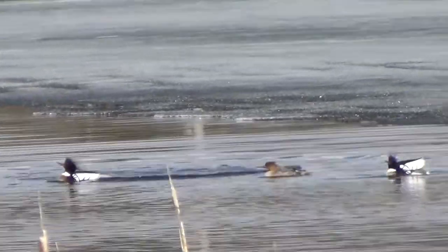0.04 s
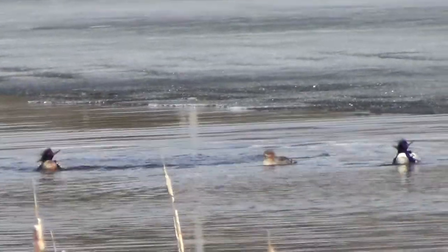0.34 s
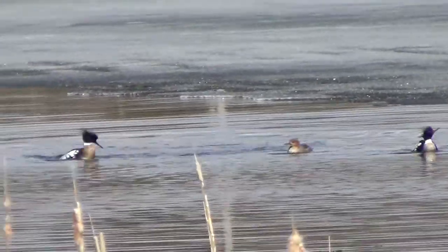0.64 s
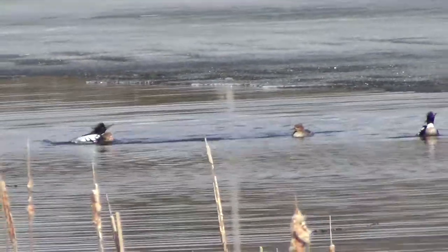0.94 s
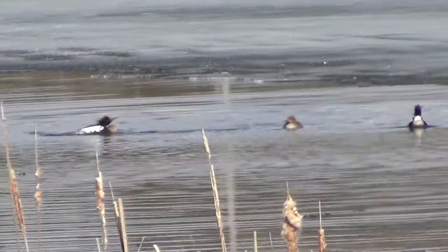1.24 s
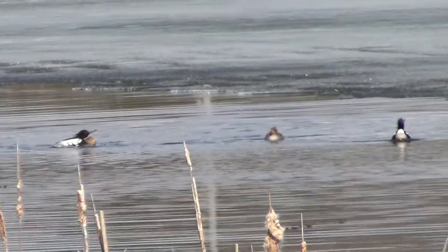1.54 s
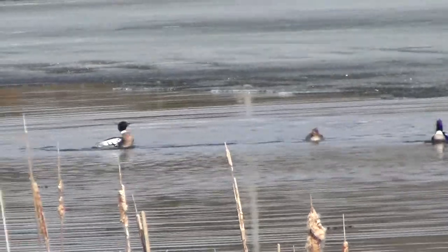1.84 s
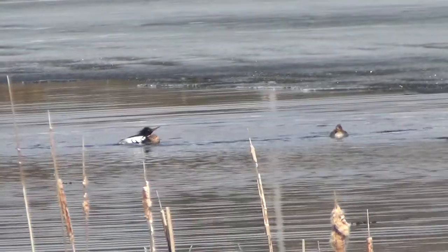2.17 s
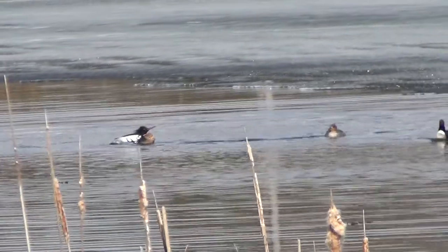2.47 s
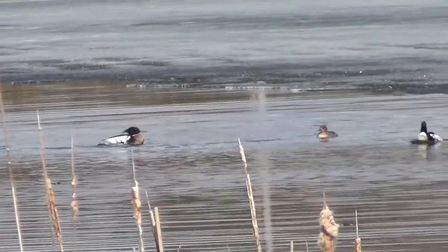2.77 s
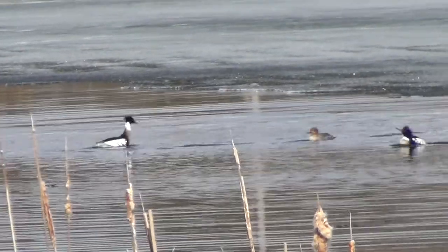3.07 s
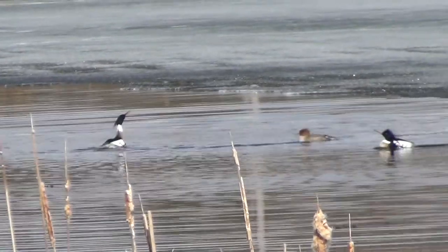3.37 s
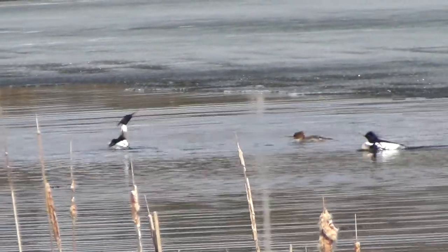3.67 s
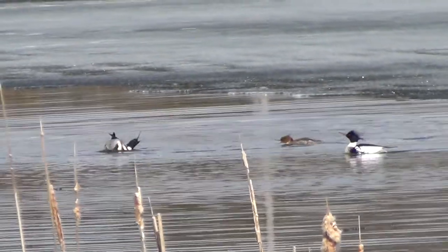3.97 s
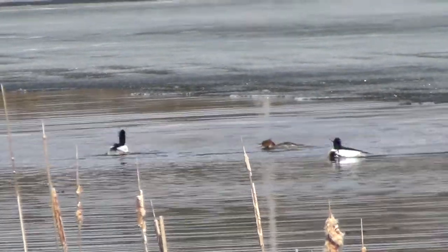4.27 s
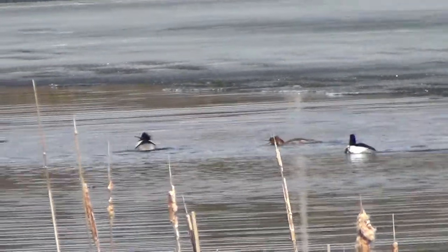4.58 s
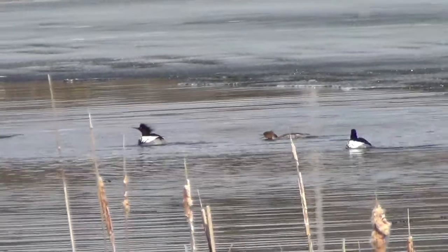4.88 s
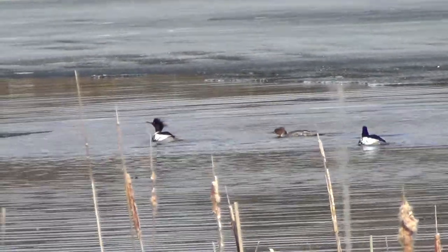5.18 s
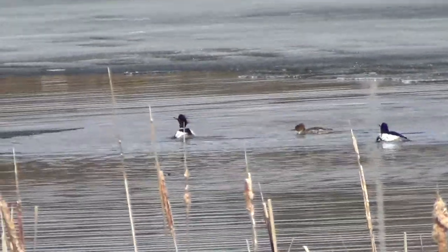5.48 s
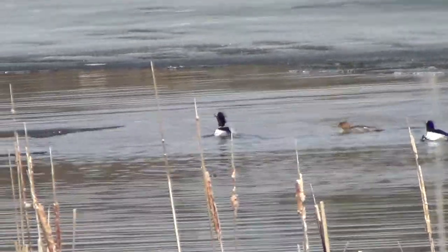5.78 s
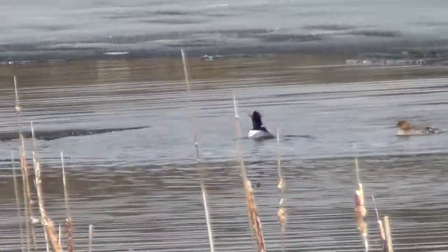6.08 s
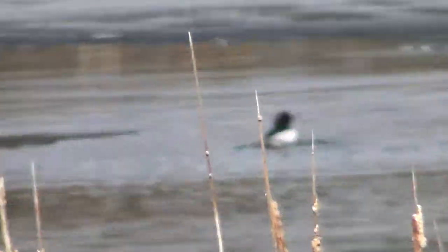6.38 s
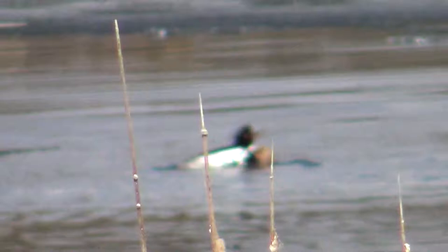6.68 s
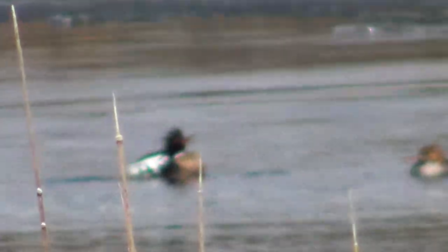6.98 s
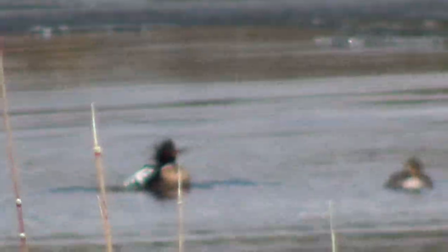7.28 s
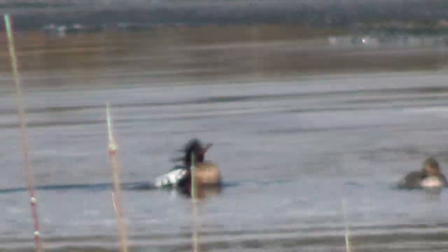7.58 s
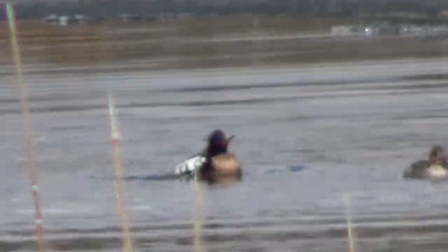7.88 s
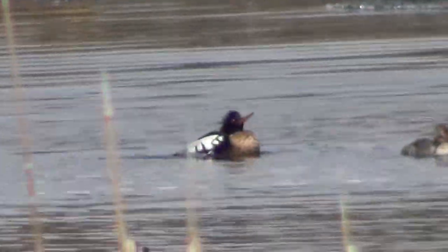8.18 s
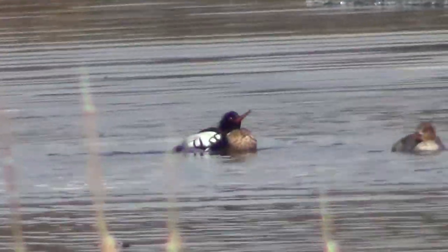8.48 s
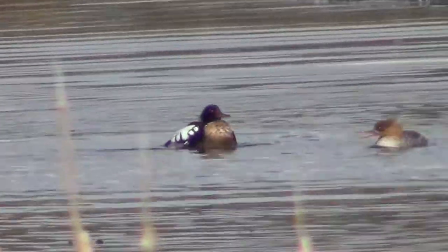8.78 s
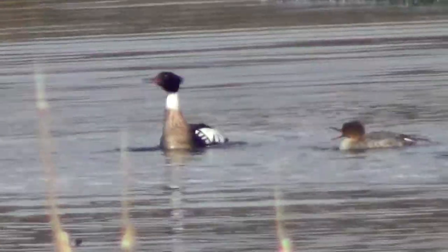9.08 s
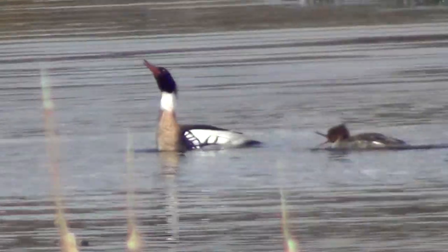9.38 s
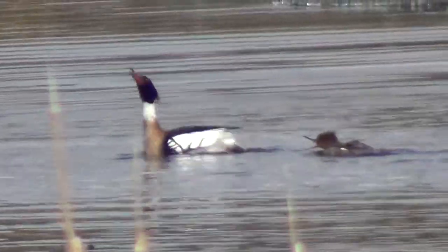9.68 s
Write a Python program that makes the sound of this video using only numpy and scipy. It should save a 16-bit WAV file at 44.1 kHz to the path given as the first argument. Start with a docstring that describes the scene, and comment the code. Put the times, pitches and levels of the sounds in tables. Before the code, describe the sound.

Light, steady wind and a low, distant engine hum lie over an open lake, while the hand-held camera whirrs faintly right at the microphone. Fingers bump its case now and then, and small birds chip far away. Just past the middle, a marsh bird gives one short, high, buzzy trill as the zoom motor hisses softly. Near the end, among faint twittering, a catch snaps sharply against the case.

```python
"""Light wind and a distant engine lie under the whirr and thin whine of a hand-held camera.
Fingers bump its case now and then, and small birds chip far off across a thawing lake.
The zoom motor runs briefly as a marsh bird at the water's edge gives one short buzzy trill,
its two voices beating in each quick syllable. Near the end a catch snaps sharply against the case."""
import sys
import numpy as np
from scipy import signal
from scipy.fft import rfft, irfft, next_fast_len
from scipy.io import wavfile
from scipy.ndimage import uniform_filter1d

SR = 44100
rng = np.random.default_rng(int(sys.argv[2]) if len(sys.argv) > 2 else 0)


def put_to_file(sound):
    """Save the sound as 16-bit audio at rate SR, in the file named by the first command-line argument."""
    columns = np.atleast_2d(sound).T  # one column per channel
    safe = np.clip(columns, -1, 1)
    whole_steps = np.round(safe * 32767)
    wavfile.write(sys.argv[1], SR, whole_steps.astype(np.int16))


N = 437913


def from_db(db):
    """Decibels to gain."""
    return 10 ** (np.asarray(db) / 20)


def curve(rows):
    """Automation lanes: each column joined by straight lines in time."""
    times, *columns = np.transpose(rows)
    return [np.interp(np.arange(N) / SR, times, column) for column in columns]


def at_hz(points, hz):
    """An EQ curve read on a log-frequency axis."""
    point_hz, values = np.transpose(points)
    return np.interp(np.log(hz + 1e-9), np.log(point_hz), values)


def add(track, s, sound):
    """Mix a short sound in from a given time."""
    i = round(s * SR)
    track[i:i + len(sound)] += sound[:N - i]


def band(x, low_hz, high_hz, order=2):
    """Causal band-pass."""
    return signal.sosfilt(signal.butter(order, [low_hz, high_hz], "band", fs=SR, output="sos"), x)


def pan(lean_db):
    """Stereo gains for a level difference, left minus right."""
    return from_db(np.array([[.5], [-.5]]) * lean_db)


def white():
    """Frequencies and spectrum of white noise of unit power per Hz."""
    size = next_fast_len(N, True)
    return np.fft.rfftfreq(size, 1 / SR), rfft(rng.standard_normal(size)) * np.sqrt(SR / 2)


def drift(rate_hz):
    """A slow random modulator with spread 1."""
    hz, noise = white()
    slow = irfft(noise * np.exp(-(hz / rate_hz) ** 2))[:N]
    return slow / slow.std()


def ring(hz, t60):
    """A struck mode."""
    t = np.arange(SR // 4) / SR
    return np.sin(2 * np.pi * hz * t) * np.exp(-np.log(1000) * t / t60)


def burst(t60, low_hz, high_hz):
    """Noise that starts at unit strength and dies away."""
    t = np.arange(SR // 2) / SR
    noise = band(rng.standard_normal(len(t)), low_hz, high_hz)
    return noise / noise.std() * np.exp(-np.log(1000) * t / t60)


def whistle(length, start_hz, end_hz, rasp, soft=0.67):
    """A gliding note; rasp shakes its pitch, soft is the share spent fading in and out."""
    size = max(8, round(length * SR))
    shake = uniform_filter1d(rng.standard_normal(SR // 6), size=49)[:size] * np.sqrt(49)
    hz = np.linspace(start_hz, end_hz, size) * (1 + rasp * shake)
    cycles = np.cumsum(hz) / SR + rng.random()
    return np.sin(2 * np.pi * cycles) * signal.windows.tukey(size, soft)


def play_notes(notes, rasp):
    """Whistles centred on their cue times."""
    out = np.zeros(N)
    for s, length, start_hz, end_hz, db in notes:
        add(out, s - length / 2, from_db(db) * whistle(length, start_hz, end_hz, rasp))
    return out


def shore(x, near_db, echo_db):
    """Lakeside reverb: reeds smear each note at once, the banks add a faint, longer tail."""
    out = x
    for db, t60 in ((near_db, 0.075), (echo_db, 0.29)):
        tail = burst(t60, 1500, 6700)
        out = out + from_db(db) * signal.fftconvolve(x, tail / np.linalg.norm(tail))[:N]
    return out


# Tone of the wind bed: f/Hz, density/(dB per Hz)
WIND_SPECTRUM = [(20, -109), (32, -95), (45, -83.5), (56, -88), (85, -86), (105, -85), (145, -78.5),
                 (190, -86), (380, -92.5), (1050, -93.5), (1600, -99), (3200, -100.5), (7000, -104),
                 (9000, -105), (14000, -108)]
# Its stereo width: f/Hz, left-right correlation (1 is mono)
WIND_CORRELATION = [(30, .6), (70, .78), (140, 0.93), (260, .78), (550, 0.83), (1200, 0.95), (2500, 1),
                    (5000, 1), (7800, 0.75), (11000, 1)]
# Its balance: f/Hz, left minus right/dB
WIND_PAN = [(30, -11), (65, -11), (130, -5.5), (220, -3.5), (400, 1), (700, 0), (1250, -2), (2300, 0.5),
            (6000, -0.5)]


def wind(breeze_db=0.02, gust_db=0.8):
    """Wind and far rumble, nearly alike on both sides; gusts move the lows, the hiss stays still."""
    (hz, mid), (_, side) = white(), white()
    alike = at_hz(WIND_CORRELATION, hz)
    stereo = np.sqrt((1 + alike) / 2) * mid + np.sqrt((1 - alike) / 2) * side * [[1], [-1]]
    bed = stereo * from_db(at_hz(WIND_SPECTRUM, hz)) * pan(at_hz(WIND_PAN, hz))
    lows = 1 / (1 + (hz / 1500) ** 2)
    gusts = from_db(breeze_db + gust_db * drift(rate_hz=.6))
    return irfft(bed * lows)[:, :N] * gusts + irfft(bed * (1 - lows))[:, :N]


# Engine drone: t/s, low tone f/Hz, low tone level/dB, upper tone level/dB
ENGINE_DRONE = [(0, 66.9, -69.5, -72), (2.4, 70.22, -68, -64.5), (6.6, 70.2, -67.5, -64.5),
                (7.9, 71.8, -66.5, -59), (8.6, 70.4, -60.5, -64.5), (9.93, 71.7, -65.5, -75)]


def distant_engine(upper_ratio=2.17, waver=0.01183, fading_db=2.5):
    """Two low tones follow one speed; they waver and fade on their way over the water."""
    low_hz, low_db, upper_db = curve(ENGINE_DRONE)
    out = 0
    for hz, db in ((low_hz, low_db), (low_hz * upper_ratio, upper_db)):
        phase = 2 * np.pi * np.cumsum(hz * (1 + waver * drift(rate_hz=6.36))) / SR
        out = out + from_db(db + fading_db * drift(rate_hz=4.7)) * np.sin(phase)
    return out * pan(lean_db=-6.0)


def motor(resonances, fader):
    """Running friction heard through the body's resonances, each with its own stereo position."""
    hz, noise = white()
    body = 0
    for centre_hz, width_hz, db, lean_db, lead in resonances:
        peak = 1 / (1 + ((hz - centre_hz) / (width_hz * 0.7)) ** 2)
        phase_offset = np.exp(1j * lead * np.array([[.5], [-.5]]))
        body = body + from_db(db) * peak * pan(lean_db) * phase_offset
    return irfft(noise * body)[:, :N] * from_db(curve(fader)[0])


# Body resonances: f/Hz, width/Hz, pre-fader density/(dB per Hz), left minus right/dB, left lead/rad
WHIRR_RESONANCES = [(600, 31, -91, 3, 0.44), (883.5, 66.5, -84.5, 1.5, 0.22), (1209, 104, -92, -9.5, 0.43),
                    (2120, 136, -99, -0.5, 0.38), (7890, 120, -101, -2, 0.79)]
# Fader ride on the whirr: t/s, gain/dB
WHIRR_FADER = [(0, 1.5), (1.8, 0), (5.6, .3), (6.6, -3.5), (8.3, 3), (9.93, -2.5)]


def drive_whirr():
    """The camera's drive runs throughout and keeps the body whirring."""
    return motor(WHIRR_RESONANCES, WHIRR_FADER)


# Modes rung by each turn of the drive: f/Hz, level/dB, t60/s
TICK_MODES = [(2094, -67, .03), (2436, -66, 0.05), (3570, -71, 0.018), (4190, -64.5, 0.026),
              (4894, -64, 0.028), (6850, -67.5, 0.022)]
FIELD_HZ = 59.94      # the camera's scan rate, which clocks flutter, whine and pips


def drive_flutter(uneven_db=2.5):
    """The drive turns once every two scan fields and ticks faintly each time."""
    out = np.zeros(N)
    for hz, db, t60 in TICK_MODES:
        mode = ring(hz, t60)
        for turn in range(int(N / SR * FIELD_HZ / 2)):
            s = (turn + .1 * rng.random()) * 2 / FIELD_HZ
            add(out, s, from_db(db + uneven_db * rng.standard_normal()) * mode)
    return out


def scan_whine(hz=15734, db=-72):
    """A thin, very high, steady whine that ducks between scan fields."""
    t = np.arange(N) / SR
    duck = 1 - .9 * (t * FIELD_HZ % 1 < .08)
    return from_db(db) * np.sqrt(2) * np.sin(2 * np.pi * hz * t) * duck


def treble_flicker(treble, depth=.4, rate_hz=12):
    """The very top of the mix flickers in level."""
    t = np.arange(N) / SR
    return treble * (1 + depth * np.sin(2 * np.pi * rate_hz * t))


# Modes of the camera's case: f/Hz, relative level/dB, t60/s
CASE_MODES = [(550, -16.5, 0.021), (710, -13, 0.027), (934, -6, 0.03), (1107, -10, 0.029),
              (1545, -9.5, 0.031), (2280, -3.5, 0.034), (2530, -7, 0.028), (2700, -8, 0.022),
              (3780, -1, 0.016), (4410, 0, 0.017), (5200, 1, .020), (5725, -6, 0.025), (6200, -6.5, 0.0096),
              (6900, -8, .015), (7360, -3, 0.017), (7830, -4, .012), (8600, -16, 0.016), (9570, -14, 0.016),
              (11300, -29, .011)]


def case_ring():
    """The struck case: short, bright modes of alternating polarity."""
    return sum((-1) ** k * from_db(db) * ring(hz, t60) for k, (hz, db, t60) in enumerate(CASE_MODES))


def case_bus(hits):
    """Hits on the case, trimmed of lows and extreme top and placed near the centre."""
    return band(hits + 1e-18, 500, 14000, order=5) * pan(lean_db=-.7)


# Finger hits: t/s, knock level/dB, scuff level/dB, case ring gain/dB
FINGER_HITS = [(.226, -72, -53, -50), (1.883, -54, -55, -69), (2.821, -52, -55, -73),
               (3.034, -48, -60, -80), (5.269, -49, -54, -66), (7.335, -48, -49, -58)]


def fingers():
    """Each touch gives a dull knock, a scuff and a little ring from the case."""
    touch, ringing = np.zeros(N), np.zeros(N)
    modes = case_ring()
    for s, knock_db, scuff_db, ring_db in FINGER_HITS:
        add(touch, s, from_db(knock_db) * burst(t60=0.098, low_hz=150, high_hz=650))
        add(touch, s, from_db(scuff_db) * burst(t60=.055, low_hz=500, high_hz=3400))
        add(ringing, s, from_db(ring_db) * modes)
    return touch * pan(lean_db=-0.5) + case_bus(ringing)


# Clear far chips: t/s, length/s, f/Hz, pre-fader level/dB
CHIP_CUES = [(.813, 0.022, 3090, -54.5), (.914, .024, 4910, -52), (2.365, 0.0056, 5350, -49.5),
             (3.155, .022, 3150, -55.5), (8.588, 0.043, 4460, -58), (9.1525, .007, 6600, -41),
             (9.207, .014, 4340, -48), (9.283, .011, 4900, -53.5), (9.345, 0.031, 2970, -58.5),
             (9.451, 0.012, 5060, -53), (9.512, 0.0067, 5600, -47), (9.561, 0.012, 4730, -48)]
# Spells of faint twitter behind them: start t/s, end t/s, rate/(chips per s)
TWITTER_SPELLS = [(2.6, 7.4, .8), (8.2, 9.7, 6)]


def small_birds(twitter_s=.028, twitter_hz=4200, twitter_db=-61.5, flat_chip_s=.016):
    """Far chips and random twitter; chips under flat_chip_s flick upward, longer ones droop."""
    chips = list(CHIP_CUES)
    for start, end, per_s in TWITTER_SPELLS:
        count = round((end - start) * per_s)
        for k, (when, long, high, loud) in enumerate(rng.uniform(-1, 1, (count, 4))):
            s = start + (end - start) * (k + (1 + when) / 2) / count
            chips.append((s, twitter_s * 2 ** long, twitter_hz * 2 ** (.2 * high), twitter_db + 2 * loud))
    notes = []
    for s, length, hz, db in chips:
        rise = (flat_chip_s / length) ** 0.0745
        notes.append((s, length, hz / rise, hz * rise, db))
    return play_notes(notes, rasp=0.03)


# Spells when the focus hunts: start t/s, end t/s
FOCUS_HUNTS = [(1.05, 2.02), (2.95, 3.12), (4.58, 4.88), (6.98, 8.16)]


def focus_pips(hz=5440, pip_db=-64.5, pip_s=.022, every_fields=4):
    """Faint pips in step with the scan, frequent while the lens hunts and rare otherwise."""
    slots = np.arange(every_fields, N / SR * FIELD_HZ, every_fields) / FIELD_HZ
    hunting = np.any([(slots > start) & (slots < end) for start, end in FOCUS_HUNTS], axis=0)
    sounding = rng.random(len(slots)) < np.where(hunting, .75, .14)
    levels = pip_db + rng.normal(0, 2, len(slots))
    pips = [(s, pip_s, hz, hz, db) for s, db in zip(slots[sounding], levels[sounding])]
    return play_notes(pips, rasp=.012)


# Soft thumps: t/s, level/dB
GRIP_THUMPS = [(2.823, -38), (3.945, -46)]


def grip_bumps():
    """A bump through the grip rings one low, damped mode."""
    out = np.zeros(N)
    for s, db in GRIP_THUMPS:
        add(out, s, from_db(db) * ring(hz=145, t60=0.11))
    return out * pan(lean_db=-0.5)


# Zoom resonances: f/Hz, width/Hz, pre-fader density/(dB per Hz), left minus right/dB, left lead/rad
ZOOM_RESONANCES = [(5800, 540, -97.5, 0, 0.28), (8140, 630, -97.5, 0, 0.45)]
# Fader ride on the zoom: t/s, gain/dB
ZOOM_FADER = [(5.56, -40), (5.61, -1), (5.70, -12), (5.85, -5), (6.2, -1.5), (6.7, 0.5), (6.92, -6),
              (7.05, -50)]


def zoom_motor():
    """The zoom runs briefly, its friction hissing in two high bands."""
    return motor(ZOOM_RESONANCES, ZOOM_FADER)


# The marsh bird's lead-in: t/s, length/s, start f/Hz, end f/Hz, level/dB
LEAD_IN_NOTES = [(5.598, .005, 2950, 2250, -47), (5.618, .046, 2340, 2450, -49.5),
                 (5.659, .010, 2470, 2480, -51.5), (5.699, .010, 2460, 2500, -48)]


def song_lead_in():
    """The marsh bird opens with a few short whistles."""
    return play_notes(LEAD_IN_NOTES, rasp=.012)


# One syllable: two voices beating, a quick down-slur, a soft note with its octave.
# Before the trill's pitch and effort curves: offset t/s, length/s, start f/Hz, end f/Hz, level/dB
TRILL_SYLLABLE = [(-.0083, 0.013, 3175, 3185, -46.5), (-.0090, 0.015, 2570, 2930, -52),
                  (.0002, 0.0039, 5230, 4460, -44.5), (.0012, 0.00243, 4270, 2620, -47.5),
                  (.0100, .0145, 2440, 2490, -55), (.0100, .0130, 4880, 4940, -55)]


def trill(start_s=5.7287, syllables=26, period_s=.02933, slowing_s=.00006):
    """About 33 syllables a second make a buzz; the bird slows, sinks in pitch and is loudest midway."""
    notes = []
    for k in range(syllables):
        since = k * period_s + slowing_s * k * (k - 1) / 2
        pitch = 1.012 - .04 * since
        effort_db = -2.5 + np.sin(np.pi * k / (syllables - 1))
        for offset, length, start_hz, end_hz, db in TRILL_SYLLABLE:
            tune = pitch * (1 + 0.0055 * rng.standard_normal())
            note_db = db + effort_db + 0.5 * rng.standard_normal()
            notes.append((start_s + since + offset, length, start_hz * tune, end_hz * tune, note_db))
    return play_notes(notes, rasp=0.017)


# The chord that ends the song: f/Hz, starting level/dB
CHORD_TONES = [(3140, -50.5), (2650, -50.5), (2850, -56), (4730, -59.5)]


def closing_chord(start_s=6.488, length_s=0.072, attack_s=0.0071, fade_db=18, sag=0.016):
    """Both voices hold the last syllable and let it droop and fade."""
    out = np.zeros(N)
    for hz, db in CHORD_TONES:
        note = whistle(length_s, hz, hz * (1 - sag), rasp=0.013, soft=2 * attack_s / length_s)
        add(out, start_s, note * from_db(db - np.linspace(0, fade_db, len(note))))
    return out


# Impacts within the one snap: t/s, case ring gain/dB, crack gain/dB
CATCH_HITS = [(9.1739, -32, -36), (9.1763, -16.5, -23), (9.1784, -41, -20.5), (9.18, -44, -25),
              (9.189, -43, -42)]


def catch_snap(tail_db=-23, sparkle_db=-9, fizz_db=-12):
    """A catch chatters against the case with a sharp, bright crack and sets it ringing."""
    centre, sides = np.zeros(N), np.zeros((2, N))
    modes = case_ring()
    for s, ring_db, crack_db in CATCH_HITS:
        crack = burst(0.0096, 820, 6200) + from_db(tail_db) * burst(0.12, 510, 3100)
        add(centre, s, from_db(ring_db) * modes)
        add(centre, s, from_db(crack_db) * crack)
        for side in sides:
            add(side, s, from_db(crack_db + sparkle_db) * burst(0.016, 7000, 8600))
            add(side, s, from_db(crack_db + fizz_db) * burst(0.013, 900, 6500))
    return case_bus(centre) + sides


def scene():
    """The mix: birds in lakeside reverb over the wind and engine, the camera close and dry."""
    song = song_lead_in() + trill() + closing_chord()
    marsh_bird = shore(song, near_db=-16.5, echo_db=-14.5) * pan(lean_db=-3.0)
    far_birds = from_db(-0.5) * shore(small_birds(), near_db=-15, echo_db=-12.5)    # farther, so wetter
    bed = wind() + distant_engine()
    camera = drive_whirr() + drive_flutter() + zoom_motor() + focus_pips()
    top = treble_flicker(scan_whine())
    handling = catch_snap() + fingers() + grip_bumps()
    return bed + camera + top + handling + far_birds + marsh_bird


def record(dry, cutoff_hz=15900):
    """A steep high cut on the master."""
    return signal.sosfilt(signal.ellip(12, .1, 80, cutoff_hz, fs=SR, output="sos"), dry)


dry = scene()
out = record(dry)
put_to_file(out)
```